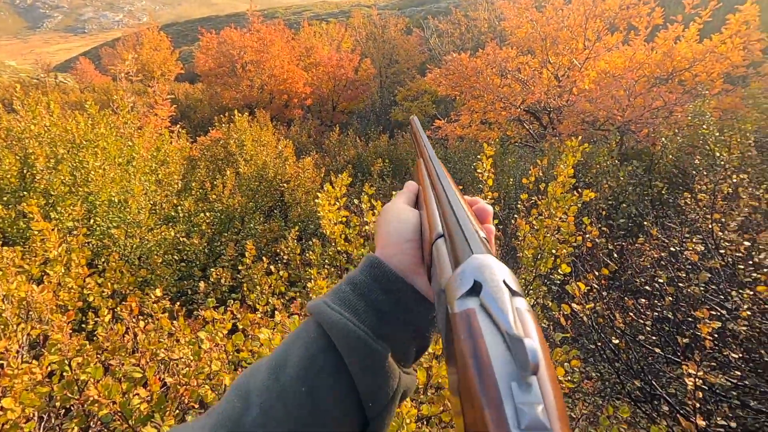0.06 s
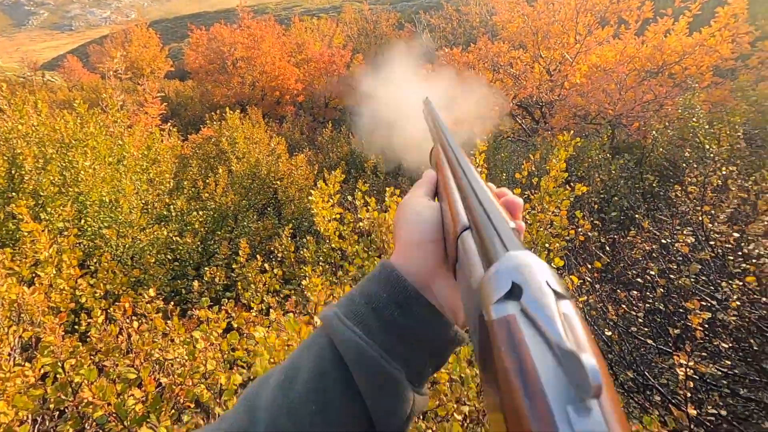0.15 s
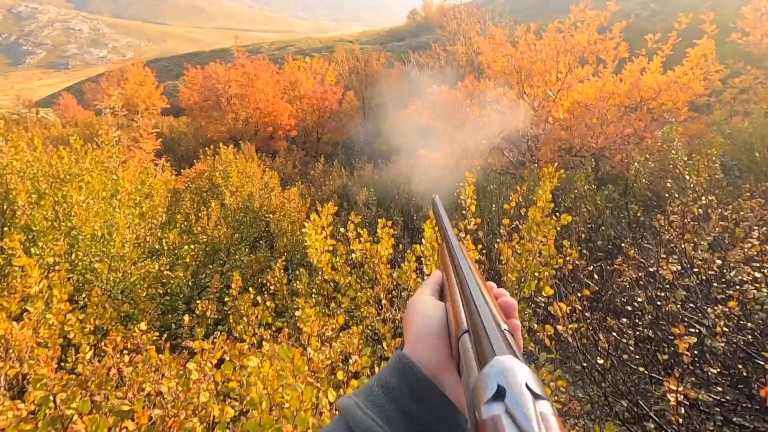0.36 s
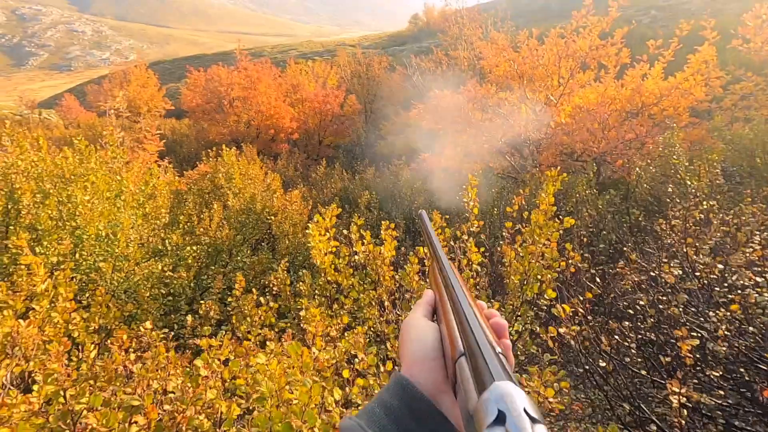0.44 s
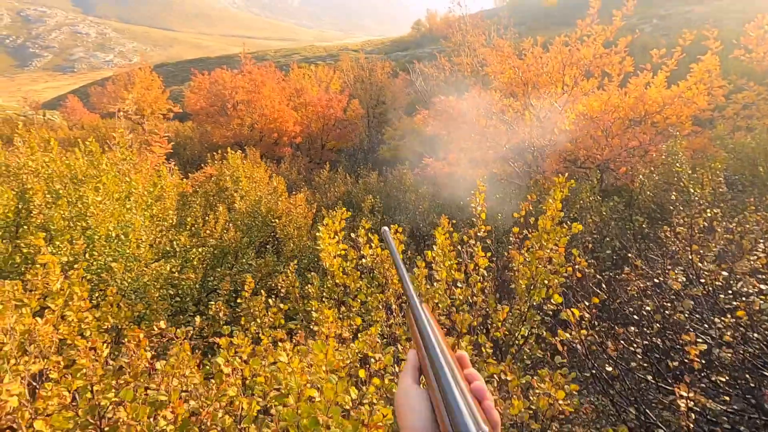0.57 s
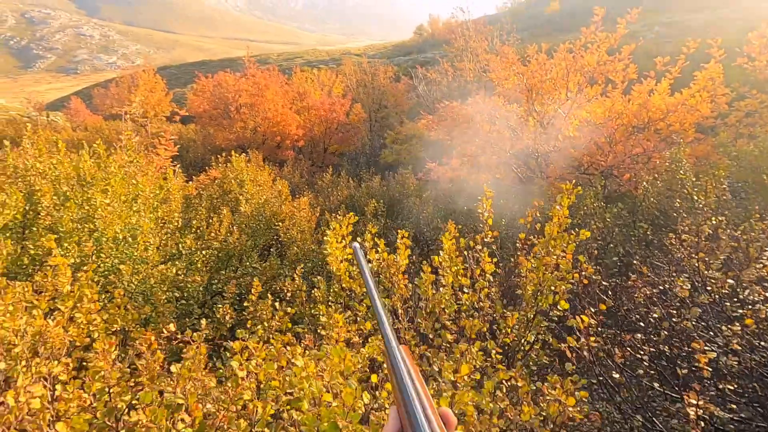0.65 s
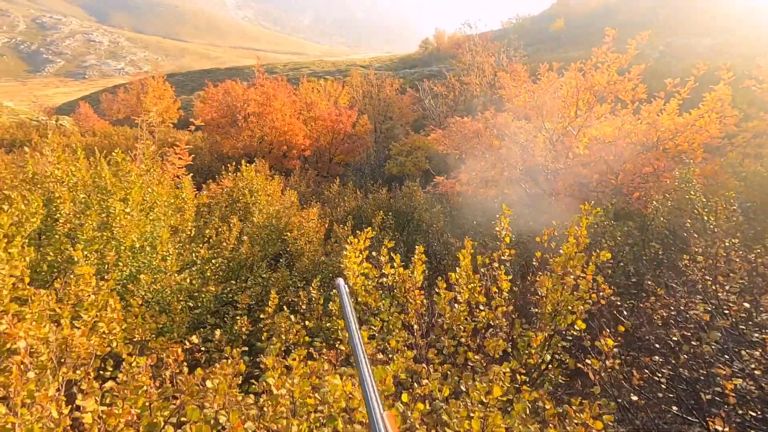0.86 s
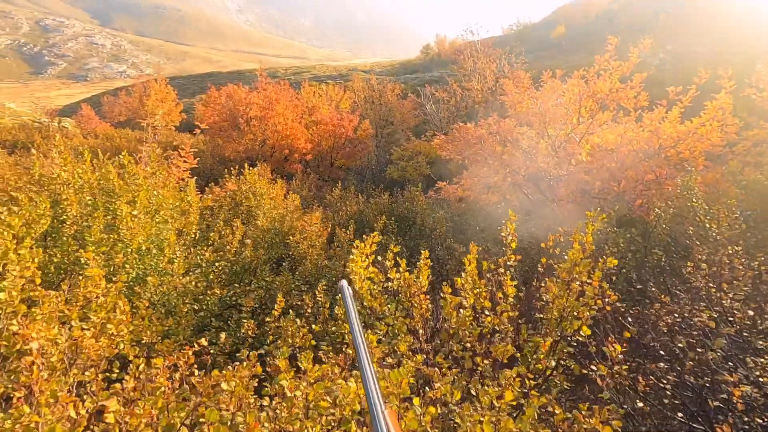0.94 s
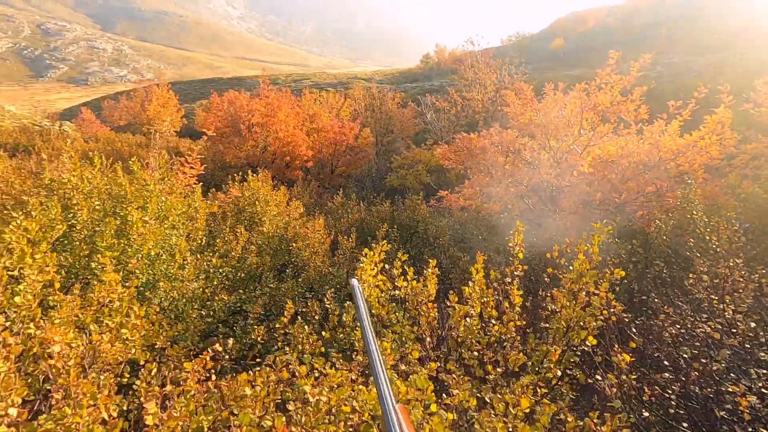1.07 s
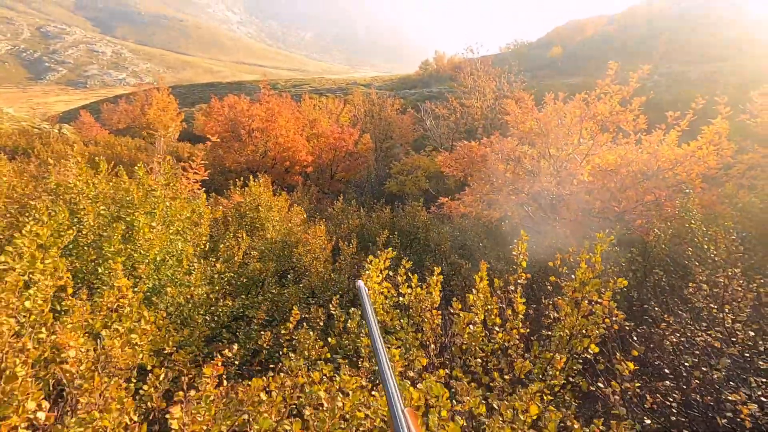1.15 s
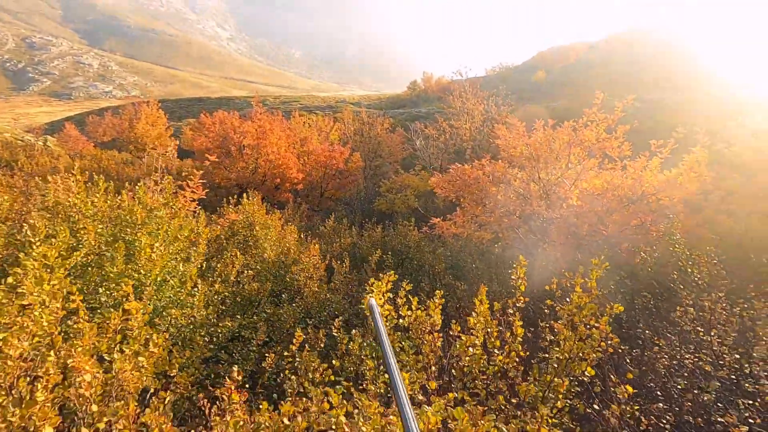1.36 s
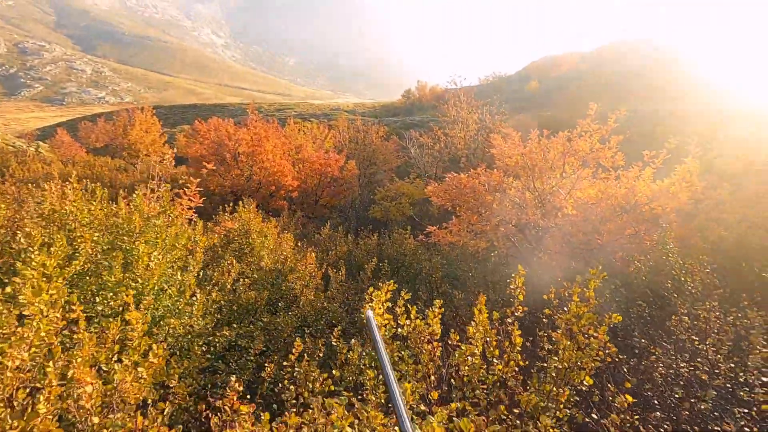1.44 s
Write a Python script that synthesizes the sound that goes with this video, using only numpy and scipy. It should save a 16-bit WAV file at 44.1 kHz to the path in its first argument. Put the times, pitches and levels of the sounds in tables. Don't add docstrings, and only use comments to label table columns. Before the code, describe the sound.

A single shotgun shot cracks at close range outdoors and rolls away in hillside echoes

```python
import sys
import numpy as np
from scipy import signal
from scipy.fft import rfft, irfft
from scipy.io import wavfile
from scipy.ndimage import uniform_filter1d

SR = 44100
rng = np.random.default_rng(int(sys.argv[2]) if len(sys.argv) > 2 else 0)


def generate_wav(sig):
    pcm = np.round(np.clip(np.atleast_2d(sig).T, -1, 1) * 32767).astype(np.int16)
    wavfile.write(sys.argv[1], SR, pcm)


def to_linear_factor(level_db):
    exponent = np.asarray(level_db, float) / 20
    return 10 ** exponent


N = 66150
TIME = np.arange(N) / SR


def evened(x):
    return x / np.sqrt(np.mean(x ** 2) + 1e-20)


def read(points, hz):
    f, value = np.transpose(points)
    return np.interp(np.log(hz + 1), np.log(f + 1), value)


def curve(rows, t, axis=1):
    rows = np.array(rows)
    return np.interp(t, rows[:, 0], rows[:, axis], left=-120 * (axis == 1))


def add(mix, s, sound):
    start = max(round(s * SR), 0)
    part = mix[start:][:len(sound)]
    part += sound[:len(part)]


def grains(spread_db):
    clump = 40
    sizes = np.minimum(rng.exponential(1, N // clump + 1), 3.5)
    return rng.standard_normal(N) * to_linear_factor(spread_db * np.repeat(sizes, clump)[:N])


def shaped(x, field_db, patch_db):
    hz, t, z = signal.stft(x, SR, nperseg=512, noverlap=384)
    patches = uniform_filter1d(rng.standard_normal(z.shape), 5, 0)
    patches = evened(uniform_filter1d(patches, 8, 1))
    z = z * to_linear_factor(field_db(hz[:, None], t) + patch_db * patches)
    return signal.istft(z, SR, nperseg=512, noverlap=384)[1][:N]


def tinted(x, points, turns):
    hz = np.fft.rfftfreq(N, 1 / SR)
    return irfft(rfft(x) * to_linear_factor(read(points, hz)) * np.exp(1j * read(turns, hz)), N)


def weather():
    # f/Hz, level/dB
    leaf_tone = [(100, -20), (170, -4), (399, -17), (750, -20.5), (1250, -9), (2110, -15.5), (2910, -24),
                 (7160, -23), (15000, -43)]
    # t/s, extra level/dB
    grip = [(0, 1), (.06, -3), (.09, 0), (.13, 2.5), (.17, -1.5), (.2, 3.5), (.8, -7), (1.08, 0),
            (1.15, -10), (1.3, 0.5)]
    leaves = shaped(grains(1.7), lambda hz, t: read(leaf_tone, hz) - 30 * (hz < 150), 3.6)
    return to_linear_factor(-55 + curve(grip, TIME)) * evened(leaves)


def roll():
    # t/s, level/dB
    swell = [(0.0, -42), (0.028, -43), (0.11, -51.5), (0.204, -41), (0.224, -25.5), (0.242, -16),
             (0.334, -36), (0.4, -29), (0.458, -37), (0.534, -43), (0.76, -62), (0.784, -40), (0.856, -54),
             (1.082, -49.5), (1.136, -41.5), (1.356, -52), (1.386, -41), (1.5, -49.5)]
    band = signal.butter(4, [24.2, 56], "band", fs=SR, output="sos")
    low = signal.sosfilt(band, rng.standard_normal(N + SR))[SR:]
    return to_linear_factor(curve(swell, TIME)) * evened(low)


def sleeve():
    # t/s, level/dB
    rubs = [(1.15, -63), (1.18, -65), (1.206, -49), (1.284, -62.5), (1.298, -46), (1.306, -47.5),
            (1.374, -51), (1.396, -42.5), (1.5, -43)]
    # f/Hz, level/dB
    cloth = [(180, -43), (300, -22), (359, 4), (577, -8), (1290, -1), (3920, -19), (7420, -9), (12100, -22),
             (15000, -38)]
    rub = shaped(grains(1.1), lambda hz, t: read(cloth, hz), 4.4)
    return to_linear_factor(curve(rubs, TIME) + 2.0) * evened(rub)


def hillside():
    # t/s, level/dB, distance share (0-1.4)
    scatter = [(0.266, -24, 0.4), (0.276, -32.5, 0.01), (0.334, -30, 0.65), (0.344, -25.5, 0.42),
               (0.482, -32.5, 0.42), (0.515, -26.5, 0.4), (0.526, -31.5, 0.38), (0.592, -33, 0.6),
               (0.598, -27, 0.56), (0.742, -37, 0.54), (0.75, -35.5, 0.4), (0.766, -35.5, 0.52),
               (0.86, -39, 0.6), (0.922, -41, 0.6), (0.97, -33, 0.92), (1.09, -40.5, 0.9),
               (1.16, -42, 1.07), (1.376, -52, 0.53), (1.424, -42, 0.66), (1.5, -39.5, 0.57)]
    # f/Hz, level/dB
    near_tone = [(35, -42), (60, -6), (158, 2.5), (514, -18.5), (982, -10), (1080, -18.5), (5060, -21.5),
                 (7500, -19), (15000, -51)]
    # f/Hz, level/dB
    far_tone = [(35, -52), (60, -23.5), (514, -2), (816, -8), (1750, -13.5), (2150, -23.5), (4950, -27.5),
                (11400, -64.5), (15000, -78)]

    def colour(hz, t):
        far = np.clip(curve(scatter, t, axis=2), 0, 1.4)
        db = (1 - far) * read(near_tone, hz) + far * read(far_tone, hz)
        core = (hz > 250) & (hz < 3000)
        return db - 10 * np.log10((core * to_linear_factor(2 * db)).sum(0) / len(hz))

    return to_linear_factor(curve(scatter, TIME)) * shaped(evened(grains(1.5)), colour, 2.0)


def rounded_waves(rows):
    out = np.zeros(N)
    for s, db, hz, cycles in rows:
        t = np.arange(-cycles / hz, cycles / hz, 1 / SR)
        bell = np.exp(-(2.65 * t * hz / cycles) ** 2)
        add(out, s + t[0], -to_linear_factor(db) * bell * np.cos(2 * np.pi * hz * t))
    return out


def slope_echoes():
    # t/s, level/dB, f/Hz, length/cycles
    returns = [(.1252, -40.5, 500, 1.9), (0.139, -39.5, 243, 3.1), (.1585, -39.5, 696, 2),
               (0.1603, -36.5, 1680, 3.0), (.1905, -33, 1080, 1.6), (.172, -41.5, 300, 2.1),
               (.279, -14.5, 178, 2.3), (.296, -17, 780, 2.5), (0.3432, -15, 420, 2.4),
               (.345, -15.5, 198, 1.5), (0.369, -18, 86.4, 8.3), (.363, -22.5, 1760, 13),
               (0.3598, -10.5, 510, 1.3), (.3685, -17.5, 300, 1.5), (0.3745, -12, 333, 1.1),
               (.3825, -17, 248, 2.1), (.3865, -23, 291, 1.5), (.4025, -15.5, 280, 2.6),
               (.4175, -24, 494, 2), (.4215, -19, 227, 3.4), (.434, -22, 64.5, 2.4), (.4555, -22, 193, 3.2),
               (.464, -24, 110, 2), (.477, -24.5, 172, 3), (0.492, -28, 248, 2.5),
               (0.5161, -10.5, 620, 2.2), (.56, -28.5, 161, 4.4), (.583, -24, 550, 5.7),
               (0.600, -17.5, 545, 2), (.6065, -26, 1700, 6), (.611, -24.5, 860, 4.5), (.628, -30, 280, 3),
               (.655, -26.5, 604, 7.4), (.676, -28, 303, 3.4), (.693, -28.5, 655, 3),
               (.708, -27, 1060, 5.6), (.724, -41, 800, 2.5), (0.7526, -23.5, 615, 9.3),
               (0.777, -31.5, 149, 2.5), (.975, -31, 546, 7.7), (1.02, -27, 534, 2.4),
               (1.165, -33.5, 610, 5), (1.217, -28.5, 129, 1.0), (1.339, -38, 620, 3),
               (1.4145, -29.5, 1000, 2.8), (1.418, -35, 1300, 5), (1.426, -34.5, 744, 6.2),
               (1.457, -35, 1400, 9.9), (1.47, -34, 1690, 6), (1.488, -37.5, 700, 6.9)]
    return rounded_waves(returns)


def gas():
    # t/s, level/dB
    escape = [(.2085, -60), (.2095, -28), (.218, -33), (.243, -22.5), (.253, -13.5), (.262, -23.5),
              (.3, -27.5), (.345, -35), (.4, -53)]
    # f/Hz, level/dB
    gas_tone = [(180, -46), (300, 6.5), (775, -4.5), (1250, 1), (1540, -3.5), (6400, -9), (12300, -27.5),
                (15000, -54)]
    hiss = shaped(grains(1.2), lambda hz, t: read(gas_tone, hz), 3.5)
    return to_linear_factor(curve(escape, TIME)) * evened(hiss)


def cracks():
    # t/s, level/dB, t60/s, ring f/Hz
    snaps = [(0.2458, -18, 0.0039, 7900), (.2477, -1, 0.008, 7770), (.2128, -28, 0.012, 4500),
             (1.193, -48, .02, 3700), (1.2, -40, .02, 5100), (.2422, -8, 0.0068, 3600),
             (.2312, -19, .006, 3700), (.252, -5.5, 0.0096, 5480), (.209, -30.5, 0.0068, 6800),
             (0.91, -49, .06, 13000), (0.802, -15.5, 0.014, 7370), (1.7, -44, 0.016, 6000),
             (1.265, -43, 0.018, 4050), (1.5, -34.5, 0.0082, 4530), (1.4, -34.5, 0.014, 6200)]
    # f/Hz, level/dB
    crack_tone = [(300, -24), (1200, 0.5), (2300, 0.5), (4200, 0), (7400, -1), (11500, -9.5), (14000, -21),
                  (15500, -37)]
    tail_db, tail_t60, rise_s = -19, 0.14, 0.00065
    out = np.zeros(N)
    t = np.arange(4096) / SR
    hz = np.fft.rfftfreq(4096, 1 / SR)
    for s, db, t60, ring_hz in snaps:
        hiss = evened(irfft(rfft(rng.standard_normal(4096)) * to_linear_factor(read(crack_tone, hz))))
        ring = np.sin(2 * np.pi * ring_hz * t)
        snap = to_linear_factor(-60 * t / t60) * (0.57 * hiss + 0.6 * ring)
        tail = to_linear_factor(tail_db - 60 * t / tail_t60) * hiss
        add(out, s, to_linear_factor(db) * np.minimum(t / rise_s, 1) * (snap + tail))
    return out


def housing_booms():
    # t/s, level/dB, f/Hz, length/cycles
    booms = [
        (.2493, -12, 146, 7.3),
        (.248, -19.5, 230, 10.4),
        (.243, -20.5, 331, 16.6),
        (.25, -24, 435, 14),
        (.245, -20, 573, 10.7),
        (.25, -18, 49, 1.7),
        (.24, -21, 960, 15.4),
        (.236, -21, 92, 1.75),
        (.2528, -2.5, 1360, 2.23),
        (.2485, -8, 1650, 5.5),
    ]
    return rounded_waves(booms)


def blast():
    # t/s, level/dB, ring start f/Hz, length/s
    shudders = [
        (.2090, -31, 1500, .0022),
        (.2125, -33, 2300, .003),
        (.2203, -18, 1700, .0042),
        (.2268, -25, 2300, .003),
        (.2306, -9.5, 1600, .0044),
        (.2372, -24, 2300, .003),
        (.2416, -8, 1500, .0042),
        (.2474, -9, 1900, .0028),
        (.2522, -3.5, 1700, .0045),
    ]
    # t/s, length/s, f/Hz, level/dB
    whine = (.2205, .024, 7910, -32)
    ring_hz, glide = 2700, 3.6
    grit_db, grit_hz = 3, 5200
    skew = 1.35
    out = np.zeros(N)
    for s, db, start_hz, length in shudders:
        u = np.arange(0, length, 1 / SR) / length
        hz = ring_hz + (start_hz - ring_hz) * np.exp(-glide * u)
        ring = np.sin(2 * np.pi * np.cumsum(hz) / SR)
        grit = signal.lfilter(*signal.butter(4, grit_hz, fs=SR), rng.standard_normal(400))[:len(u)]
        body = ring + to_linear_factor(grit_db) * (1 - 0.49 * u) * grit
        add(out, s, to_linear_factor(db) * np.sin(np.pi * u ** skew) ** 0.5 * body)
    s, length, hz, db = whine
    t = np.arange(0, length, 1 / SR)
    swell = np.sin(np.pi * t / length) ** 0.58
    add(out, s, to_linear_factor(db) * swell * np.sin(2 * np.pi * hz * t))
    return out


def scene():
    # f/Hz, side-mid level/dB
    blast_apart = [(60, -15), (200, -11), (400, 0.5), (1300, -1.5), (3300, -6.5), (4900, -11.5), (7500, -7),
                   (15000, -4)]
    # f/Hz, lead/rad
    blast_turn = [(30, 1.0), (125, 2.3), (500, 2.1), (1300, 1.7), (2500, 1.4), (12000, 1.2)]
    # f/Hz, side-mid level/dB
    apart = [(40, -15), (250, -30), (1500, -10), (3600, -8), (4200, -24), (5500, -21), (6800, -11.5),
             (12000, -8.5)]
    close = blast() + cracks() + housing_booms()
    slaps = slope_echoes()
    wide, other = (hillside() + roll() + gas() for _ in range(2))
    mid = close + slaps + wide + weather() + sleeve()
    near_side = close + to_linear_factor(-9.5) * sleeve()
    far_side = other + to_linear_factor(6.5) * weather() + np.roll(slaps, 9)
    side = tinted(near_side, blast_apart, blast_turn)
    side = side + tinted(far_side, apart, [(60, 1.7), (8000, 1.9)])
    return np.array([mid, mid]) + np.outer([1, -1], side)


def top_cut(x):
    return signal.sosfilt(signal.butter(12, 15560, fs=SR, output="sos"), x)


def record(dry):
    held = 1.194 * np.tanh(dry / 1.387)
    mix = signal.oaconvolve(held, signal.firwin(255, 15300, fs=SR)[None], "same")
    return top_cut(mix)


dry = scene()
out = record(dry)
generate_wav(out)
```